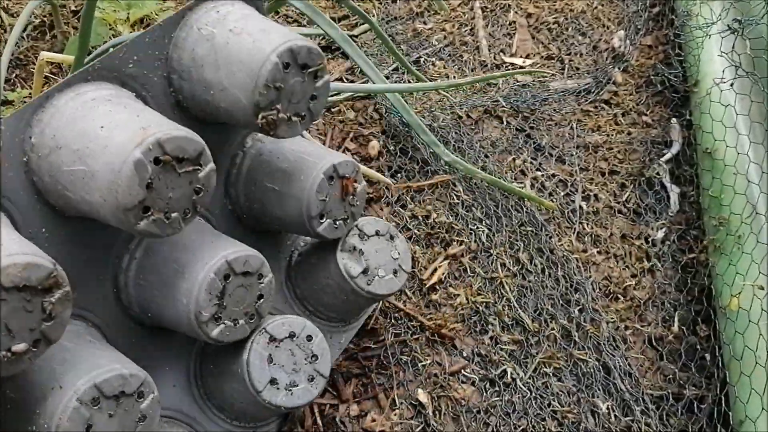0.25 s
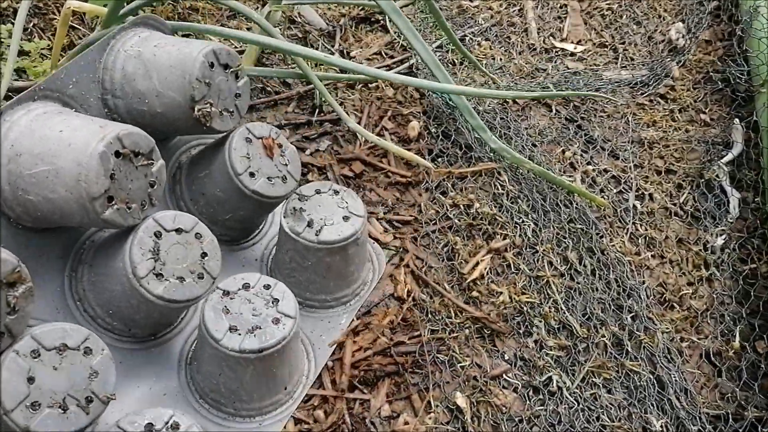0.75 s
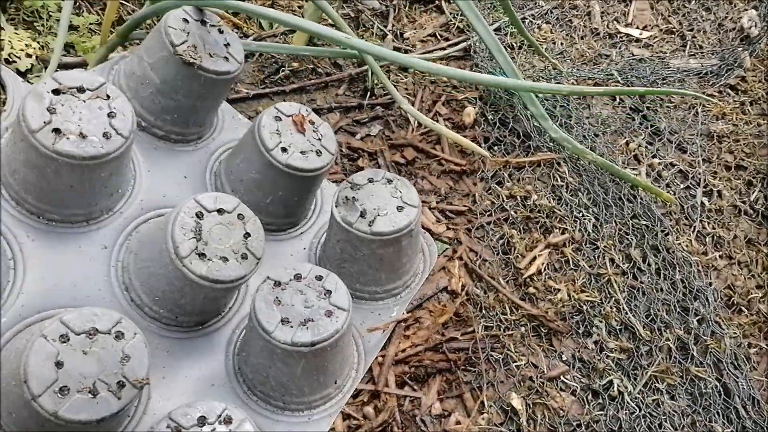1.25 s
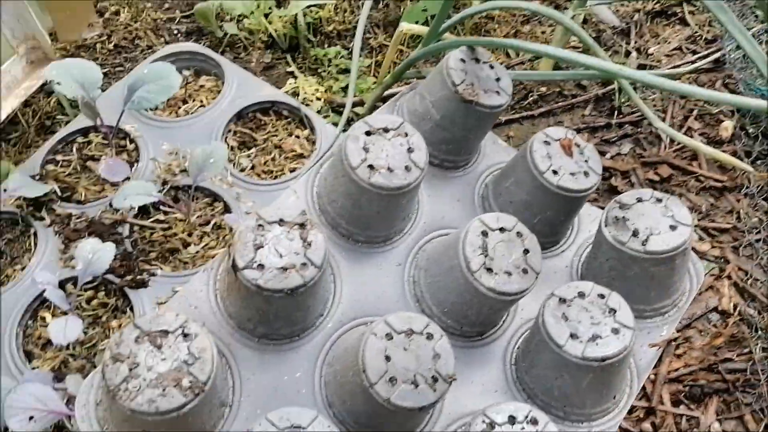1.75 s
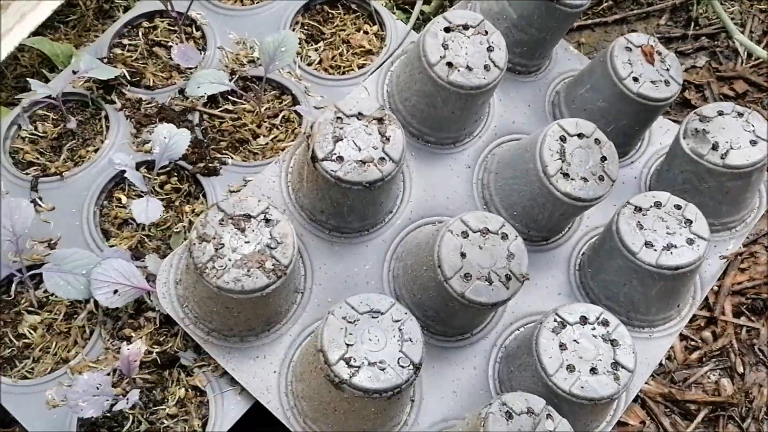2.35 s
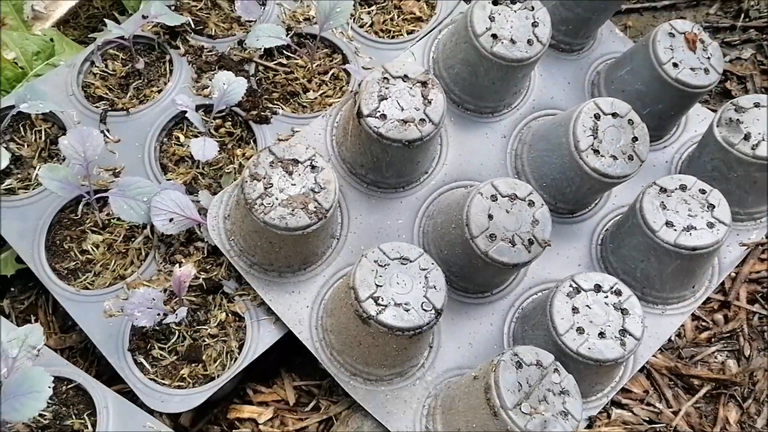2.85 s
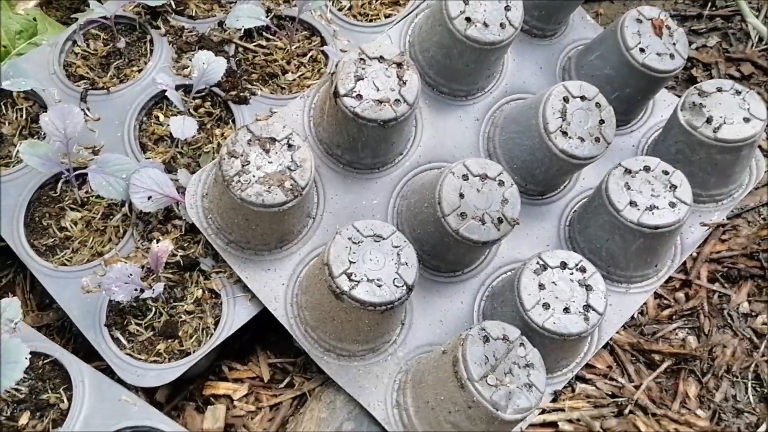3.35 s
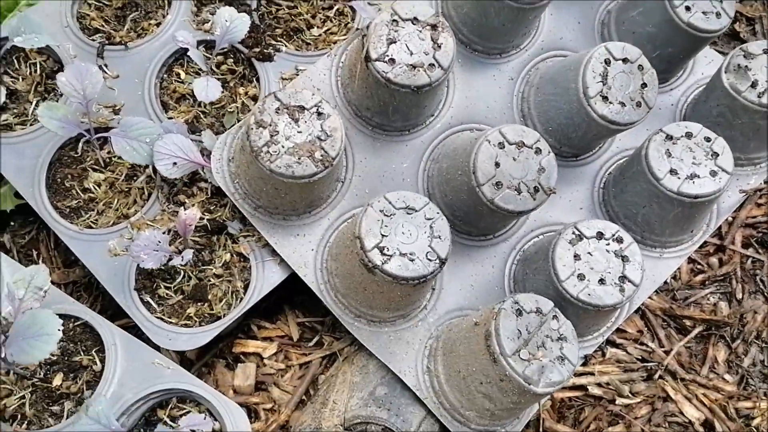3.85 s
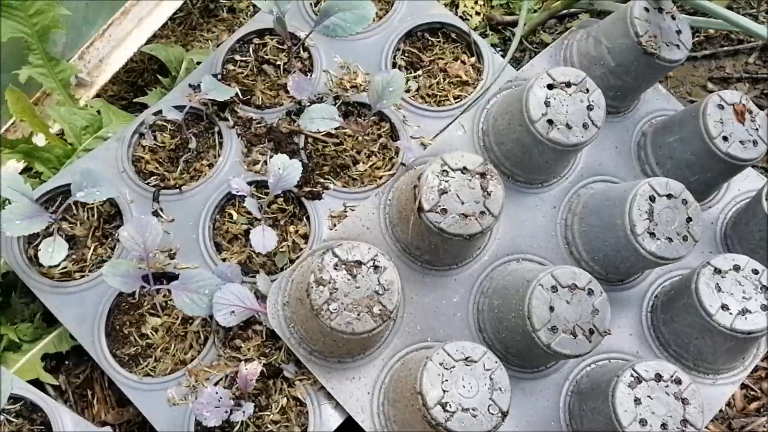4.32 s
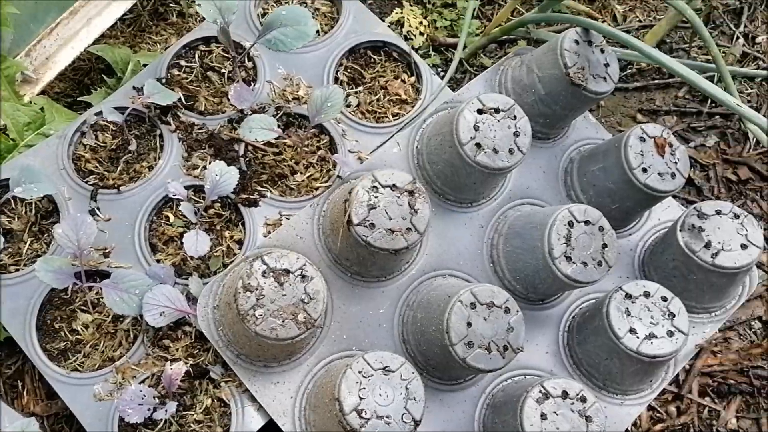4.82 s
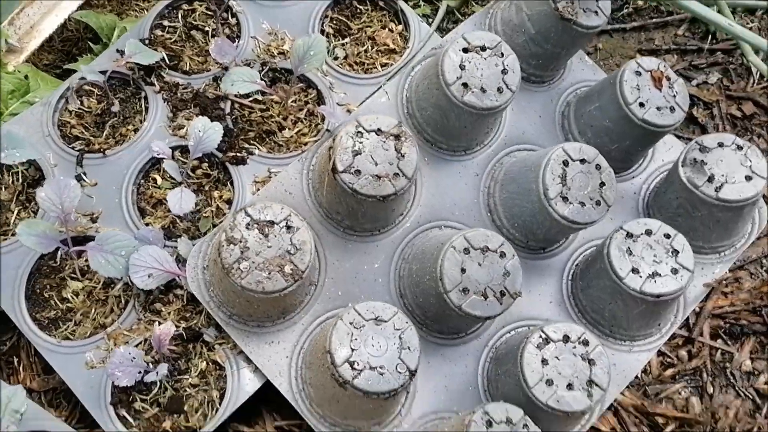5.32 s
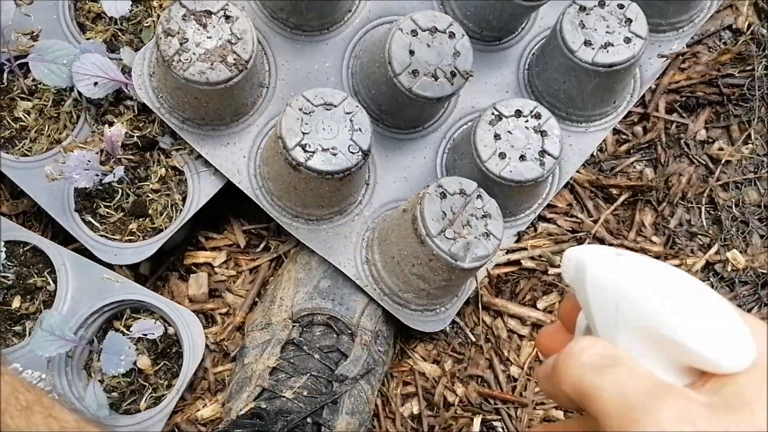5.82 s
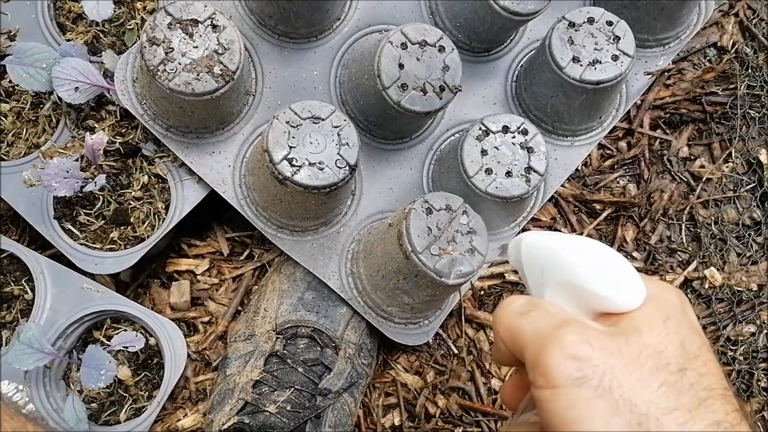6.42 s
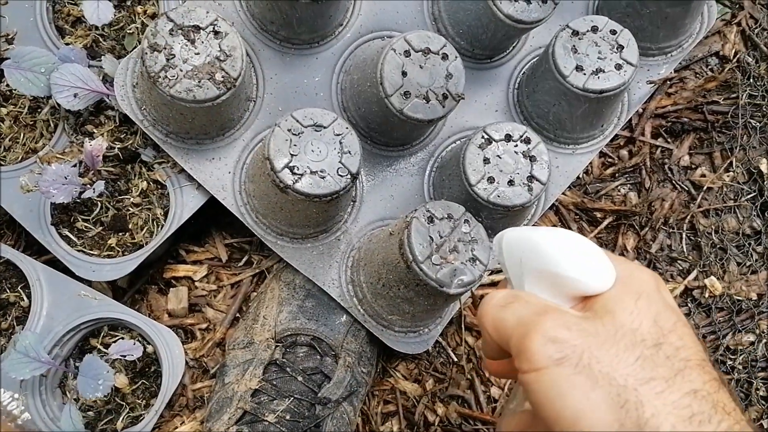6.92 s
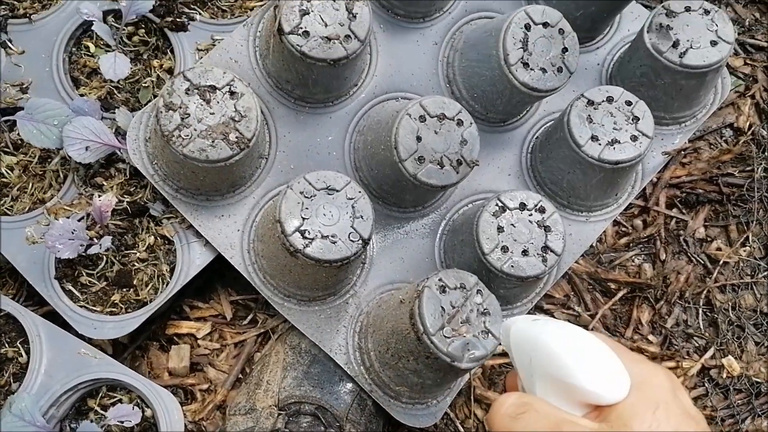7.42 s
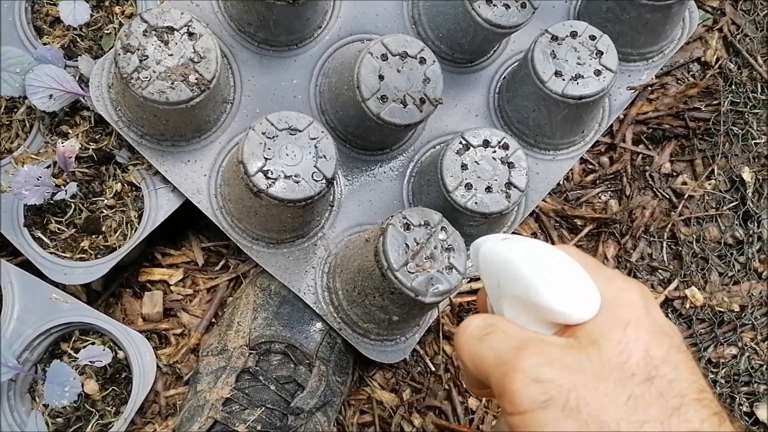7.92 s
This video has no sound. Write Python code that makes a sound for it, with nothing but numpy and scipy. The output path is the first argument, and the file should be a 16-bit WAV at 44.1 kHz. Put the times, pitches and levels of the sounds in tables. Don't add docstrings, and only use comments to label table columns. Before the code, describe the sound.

A quiet garden heard close up in stereo, with low distant traffic and blurred sparrow chatter. From 0 to 0.5 seconds a thin plastic pot tray is turned over: quick hollow knocks, rough rubbing, creaks and gritty ticks. Softer contacts follow near 0.9 to 1.05 and 1.35 as it is set down. Until about 3.7, light rustling and dry ticks leave room for short falling sparrow chirps, some nearby, some echoing off walls, plus very faint high whistles. From 3.8 to 5.6 a plastic bottle is picked up, with lower hollow bumps, rubbing, crackles and a sleeve brush, strongest around 5.2. After a brief lull, four trigger pulls start at about 6.5, 6.85, 7.1 and 7.4: clicks, spitting spurts, airy mist and wet patter on plastic, each fading fast. Sparrows chirp again around 6.9 and from 7.8 to the end.

```python
import sys
import numpy as np
from scipy import signal
from scipy.fft import rfft, irfft
from scipy.io import wavfile
from scipy.ndimage import uniform_filter1d

SR = 44100
rng = np.random.default_rng(int(sys.argv[2]) if len(sys.argv) > 2 else 0)


def gain_from_db(level_db):
    decades = np.asarray(level_db, float) / 20
    return 10 ** decades


def wav_out(sig):
    wavfile.write(sys.argv[1], SR, np.round(np.clip(np.atleast_2d(sig).T, -1, 1) * 32767).astype(np.int16))


N = 360297

# time in seconds, deep rumble in dB, traffic in dB, far sparrow chorus in dB.
BACKGROUND = [(0.0, -55.5, -63, -61.5), (2.73, -59.5, -59.5, -64.5), (4.28, -53.5, -56, -63.5),
              (6.6, -60, -60, -61), (8.17, -51.5, -60.5, -64.5)]
# frequency in Hz, strength in dB per Hz.
RUMBLE_COLOUR = [(12, -19), (20, -8), (65, 1.5), (119, -2.5), (170, -11), (220, -52), (370, -120)]
TRAFFIC_COLOUR = [(88, -37), (150, 0.5), (179, -1), (237, 3), (300, 1.5), (498, -12.5), (718, -13.5),
                  (1360, -17.5), (2500, -23.5), (3250, -41), (5500, -120)]
CHORUS_COLOUR = [(880, -58), (1500, -5), (1730, -10.5), (1990, -2), (3740, 2), (4390, 2), (6200, -8.5),
                 (8060, -20), (13600, -120)]
AIR_COLOUR = [(2650, -24), (4500, -2), (5020, -2), (8370, -11), (9730, -20), (14400, -12), (15400, -20)]
AIR_DB = -83
# frequency in Hz, likeness from 0 to 1.
LIKENESS = [(60, 0.88), (240, 0.91), (950, 0.23), (3770, 0.036), (15000, 0.084)]

# time in seconds, level in dB, left over right in dB.
RUSTLE = [(0.0, -64, -1), (0.7, -82.5, 3), (1.0, -68.5, 2), (1.71, -77, 3.5), (2.39, -57.5, 2),
          (2.71, -74.5, 14.5), (2.89, -72.5, -1), (3.03, -80, 6), (4.59, -65.5, 1.5), (5.03, -51.5, 5.5),
          (5.19, -68.5, 7), (5.7, -69.5, 4), (6.1, -88, 5), (6.3, -61.5, 2), (6.5, -71, 2), (7.0, -71, -4),
          (7.36, -69, 5), (8.17, -78.5, 0)]
# closest pass in seconds, half length in seconds, level in dB.
BRUSHES = [
    (1.36, 0.087, -60.5),
    (3.79, 0.051, -59.5),
    (4.99, 0.024, -47.5),
    (5.412, 0.037, -48.5),
    (6.33, 0.019, -56),
]
# frequency in Hz, strength in dB per Hz.
RUSTLE_COLOUR = [(1760, -20), (3000, -11.5), (4320, -8.5), (8070, -12.5), (9710, -10), (12400, -23),
                 (14500, -24.5), (15400, -18.5)]
BRUSH_COLOUR = [(2060, -39), (3500, -13), (4690, -15), (5600, -0.5), (6770, -10), (10300, -6.5),
                (12000, -22), (15500, -24)]
SWELL_DEPTH_DB, SWELL_ROUNDNESS = 21.5, 0.888
BRUSH_ROUNDNESS = 4

# firmest rub in seconds, half length in seconds, level in dB.
TRAY_GRIPS = [
    (.11, 0.095, -52),
    (.165, 0.037, -50.5),
    (.255, 0.067, -52),
    (.33, 0.22, -48.5),
    (.45, 0.18, -54),
    (.92, 0.19, -59),
    (1.04, 0.17, -54),
    (1.37, 0.28, -58.5),
]
# firmest rub in seconds, half length in seconds, level in dB.
BOTTLE_GRIPS = [(3.8, 0.27, -58.5), (3.97, 0.29, -60.5), (4.33, 0.085, -69), (4.42, 0.048, -54),
                (4.47, 0.072, -77), (4.58, 0.2, -61.5), (4.86, 0.085, -58), (4.88, 0.49, -56),
                (5.03, 0.098, -50), (5.1, 0.073, -62), (5.17, 0.14, -45.5), (5.44, 0.2, -52.5),
                (5.6, 0.1, -54), (6.3, 0.31, -56), (6.56, 0.089, -52.5), (6.72, 0.082, -59),
                (6.88, 0.07, -60), (7.2, 0.84, -62)]
TRAY_HOLLOW_HZ, BOTTLE_HOLLOW_HZ = 750, 391.7

# time in seconds, peak in dB, hollow note in Hz, wall ring in dB.
TRAY_KNOCKS = [
    (0.0, -55.5, 974, 9.5),
    (0.065, -35, 775, -1.5),
    (0.171, -39.5, 767, -18),
    (0.238, -44, 654, -24),
    (0.302, -34.5, 752, -15),
    (0.339, -38.5, 892, -9),
    (0.428, -39.5, 677, -16),
    (0.925, -51.5, 980, -2),
    (1.044, -40.5, 792, -17),
    (1.338, -45, 907, -9),
]
# time in seconds, peak in dB, hollow note in Hz, wall note in Hz, wall ring in dB.
BOTTLE_KNOCKS = [(3.78, -38, 344, 2330, -7), (3.8, -42, 350, 3320, -0.5), (3.823, -47, 355, 2200, -2),
                 (3.952, -42, 390, 2860, -14), (4.121, -39, 330, 2100, 2), (4.319, -59.5, 366, 1430, 10),
                 (4.455, -48, 400, 1400, -23), (4.549, -38, 465, 870, -4), (4.686, -42, 253, 1180, 3.5),
                 (4.74, -58, 282, 2330, 18), (4.85, -42.5, 404, 3130, 0), (5.028, -36.5, 443, 1440, -8.5),
                 (5.079, -46.5, 293, 2180, 5), (5.167, -32, 453, 1690, 4.5), (5.227, -43, 476, 1410, 1),
                 (5.41, -39.5, 400, 1370, -11), (5.577, -46.5, 272, 1440, -12)]
# time in seconds, peak in dB, hollow note in Hz, wall note in Hz,
# wall ring in dB.
TRIGGER_KNOCKS = [
    (6.401, -52.5, 256, 2350, 9.5),
    (6.566, -46.5, 484, 3260, -12),
    (6.691, -46, 500, 2140, 12.5),
    (6.855, -44.5, 280, 1400, 7),
    (6.994, -49.5, 360, 3360, -10),
    (7.131, -45, 340, 3120, 4),
    (7.148, -45.5, 280, 3180, -9),
    (7.407, -52.5, 286, 3340, 16.5),
]
TRAY_PAN_DB, BOTTLE_PAN_DB = 1.5, 3.5
TRAY_WALL_RATIO = 2.13
TRAY_CRACK, BOTTLE_CRACK, TRIGGER_CRACK = 1.6, .15, .12
# time in seconds,
# peak in dB, pitch in Hz, left over right in dB.
TICKS = [(0.065, -47, 5800, 6), (0.171, -35, 5130, -1), (0.275, -43, 3900, -4), (0.243, -46, 5000, 0.5),
         (0.3403, -30.5, 5840, 2.5), (0.593, -44, 7450, 1), (0.428, -46, 5640, 0.5),
         (2.6319, -56, 5360, -8), (2.6876, -39, 5500, 15), (2.7626, -43.5, 5640, 23),
         (2.8777, -33, 7730, -4.5), (3.728, -39.5, 5430, 7), (4.2256, -34, 5700, 6),
         (4.377, -39.5, 4580, 5), (4.41, -27.5, 6360, 2), (4.685, -41, 2880, 2.5), (5.169, -34.5, 5500, 27),
         (5.233, -41.5, 5470, 22), (6.272, -45, 5950, 2), (7.407, -33, 6850, 13)]
# time in seconds, peak in dB, pitch in Hz, left over right in dB.
TAPS = [(0.065, -21, 1560, 0.5), (0.0652, -21.5, 3080, -3), (0.0678, -25.5, 2380, -2.5),
        (0.0708, -30.5, 906, 1), (.098, -46, 886, 3), (.144, -41, 686, 1), (.158, -48, 690, 0.5),
        (.183, -44, 710, -1), (.201, -53, 598, 1), (.219, -48, 570, -2), (.258, -38, 695, 0),
        (.295, -29, 700, 2.5), (.322, -35, 750, 10), (.36, -38, 755, -2), (.385, -54, 700, -9),
        (.461, -35, 710, 2), (.518, -48, 705, 1.5), (.699, -55, 690, 1), (.845, -57, 770, -2),
        (.899, -58, 666, -4), (0.926, -38, 2500, 9), (.993, -51, 754, 5), (1.026, -51, 907, -1),
        (1.422, -54, 869, -5), (2.632, -45.5, 1890, 3.5), (2.878, -47, 2060, 0.5), (4.498, -49, 1500, 3),
        (4.56, -39, 1010, 5), (4.639, -42, 2400, 3), (4.686, -33, 2700, 2.5), (4.696, -33, 1160, 1),
        (4.832, -44, 480, 1), (4.867, -37, 420, 1.5), (4.89, -40, 1490, 11), (5.012, -41, 1360, 17),
        (5.152, -44, 1530, 9), (5.325, -53, 1550, 1), (5.463, -39, 2730, 1), (5.466, -42.5, 435, 1.5),
        (7.406, -29, 6550, 7), (5.557, -52, 1426, 13), (6.282, -39, 7800, 5.5), (6.314, -36, 7750, 13),
        (6.5382, -28, 3300, 4), (6.5452, -18, 3320, 1), (6.849, -46, 3600, 6), (6.678, -42, 2320, 4.5),
        (6.7, -50, 2400, 2), (6.718, -40.5, 420, 2.5), (6.745, -51, 2300, -4)]
TAP_CYCLES = 27

# start in seconds, length in seconds, first pitch in Hz, last pitch in Hz, level in dB.
NEAR_CHIRPS = [(0.315, 0.078, 4400, 2880, -46), (0.378, 0.056, 4320, 2445, -48),
               (1.39, 0.047, 3300, 3210, -48), (1.425, 0.043, 3200, 2386, -49.5),
               (1.585, 0.073, 4670, 2920, -54), (1.72, 0.035, 3600, 3800, -52),
               (1.752, 0.028, 3500, 2660, -53), (1.775, 0.041, 2810, 2470, -45),
               (1.823, 0.06, 4700, 2930, -52), (2.4, 0.046, 4600, 2880, -42.5),
               (2.435, 0.036, 3620, 2310, -43.5), (2.785, 0.042, 3250, 3305, -51),
               (2.835, 0.026, 3380, 2830, -51.5), (2.992, 0.059, 4460, 2730, -43.5),
               (3.045, 0.047, 3040, 2530, -45), (3.085, 0.095, 3860, 2267, -45.5),
               (3.306, 0.038, 4500, 3280, -51.5), (3.335, 0.071, 3700, 2650, -49.5),
               (3.522, 0.031, 4150, 3830, -55.5), (3.552, 0.044, 4100, 3000, -58),
               (3.895, 0.066, 3880, 2760, -49.5), (3.953, 0.076, 4086, 2440, -44.5),
               (4.065, 0.074, 4580, 3310, -46.5), (4.17, 0.039, 4300, 2790, -46),
               (4.778, 0.045, 4430, 3380, -48), (4.822, 0.058, 3250, 2915, -50),
               (5.69, 0.054, 4700, 2610, -43.5), (5.776, 0.083, 4120, 3180, -47.5),
               (6.915, .018, 3970, 3920, -44), (6.945, 0.041, 4150, 3530, -47.5),
               (6.98, 0.049, 4200, 2490, -49.5), (7.86, 0.079, 3300, 2725, -55),
               (7.908, 0.036, 4550, 4480, -51.5), (7.918, 0.051, 4100, 3320, -44.5),
               (7.965, 0.035, 3700, 2890, -53), (8.138, 0.019, 2670, 4150, -56),
               (8.154, 0.025, 4240, 3110, -41.5)]
# start in seconds, length in seconds, first pitch in Hz, last pitch in Hz,
# level in dB.
FAR_CHIRPS = [(0.075, 0.076, 4380, 3900, -54.5), (0.155, 0.092, 3720, 3640, -52),
              (0.62, 0.044, 4300, 3200, -59), (0.67, 0.055, 4220, 3630, -66),
              (0.775, 0.059, 4340, 3260, -56), (1.1, 0.061, 3730, 3620, -57),
              (1.87, 0.082, 4520, 4160, -53.5), (1.97, 0.11, 4460, 4380, -67),
              (2.13, 0.14, 4630, 4380, -61), (2.28, 0.16, 4700, 3880, -51), (3.127, 0.1, 4220, 3250, -52),
              (3.66, 0.045, 4250, 2940, -48), (3.61, .05, 3980, 4180, -55), (3.36, 0.048, 4570, 4350, -61),
              (4.27, 0.077, 3880, 3080, -53.5), (4.32, 0.06, 4300, 2904, -48.5),
              (4.585, 0.055, 3750, 3500, -46), (5.066, 0.085, 4370, 3204, -49.5),
              (7.797, 0.045, 4200, 4210, -48)]
NEAR_SHAKE, FAR_SHAKE = .045, .08
EDGE_SOFTNESS = .42
SPARROW_PAN_DB, FAR_DIRECT_DB = 1.68, -13
YARD_T60_S, YARD_DB = .3, -0.6
# start in seconds, length in seconds, first pitch in Hz, last pitch in Hz,
# level in dB.
WHISTLES = [(.81, 0.062, 9800, 9350, -69), (.86, 0.048, 9500, 9750, -67), (.945, .02, 9800, 9550, -74),
            (.975, 0.045, 9800, 9900, -75), (1.0, 0.055, 11000, 11200, -74),
            (1.08, 0.027, 11100, 10700, -75), (1.155, .025, 10200, 11200, -72),
            (1.175, 0.03, 9900, 9750, -82), (1.265, .09, 11300, 11000, -77),
            (1.275, 0.044, 10000, 9800, -80), (1.45, 0.12, 10550, 10100, -67),
            (3.695, 0.049, 9600, 9000, -62), (3.805, 0.067, 10650, 11800, -75),
            (3.81, .03, 9100, 9300, -73), (3.845, 0.04, 8100, 8200, -77), (3.935, 0.033, 9700, 9100, -76),
            (3.98, .03, 9200, 9600, -68), (4.11, .07, 10900, 10200, -61), (5.985, 0.044, 9200, 9900, -85),
            (6.06, 0.057, 10800, 11000, -85), (6.1, 0.05, 11050, 10750, -73), (6.125, .05, 9150, 9600, -72),
            (6.175, 0.045, 9450, 9300, -67.5), (6.205, 0.037, 9300, 9800, -73),
            (6.22, 0.046, 10300, 10700, -85), (6.23, 0.068, 9100, 9800, -84),
            (6.37, 0.033, 8950, 9400, -76), (6.4, .025, 9500, 9650, -69), (6.425, .03, 9400, 9400, -74),
            (6.455, .04, 9800, 9550, -74.5), (6.49, 0.026, 9350, 8950, -73)]

# start in seconds, length in seconds, mist in dB, splash on the pot in dB,
# sag as pressure drops in dB per second.
PULLS = [
    (6.538, 0.21, -50.5, -54, 54.5),
    (6.847, 0.36, -50.5, -55.5, 65),
    (7.118, 0.19, -45.5, -69, 100),
    (7.412, 0.14, -44.5, -44.5, 136),
]
# time in seconds, splash peak in dB, mist peak in dB.
SPURTS = [(6.534, -20.5, -45), (6.543, -21, -33), (6.559, -53.5, -36), (6.677, -39, -66), (6.686, -38, -63),
          (6.846, -31, -60), (6.854, -27, -44), (6.873, -47, -35.5), (6.886, -54, -41), (6.906, -56, -48),
          (6.918, -56, -49), (6.9504, -50, -35), (6.991, -30, -49), (7.0404, -66.5, -49),
          (7.0866, -59, -42), (7.127, -22, -39.5), (7.14, -32, -34), (7.161, -44, -39)]
# frequency in Hz, strength in dB per Hz.
MIST_COLOUR = [(2350, -24), (4000, -11.5), (4400, -14.5), (5590, -12), (8080, -14), (9740, -8.5),
               (10200, -10.5), (11000, -18), (14600, -19), (15400, -25)]
SPLASH_COLOUR = [(530, -52), (900, -17.5), (1920, -22.5), (2270, -5), (2820, -12.5), (3290, -3), (4220, -9),
                 (7000, -16.5), (9100, -27), (15400, -120)]
PRESSURE_RISE_S, RISE_DB, SPLASH_SAG_RATIO = 0.046, 10, 0.57
SHUT_S, SHUT_DB = .05, 18
SPURT_T60_S, SPURT_RISE_S = 0.047, 0.0059
PUFF_T60_S, PUFF_RISE_S = 0.045, 0.0062

CUTOFF_HZ = 16000


def in_time(rows):
    s, *columns = np.transpose(rows)
    return [np.interp(np.arange(N) / SR, s, column) for column in columns]


def at_hz(points, hz):
    point_hz, value = np.transpose(points)
    return np.interp(np.log(hz), np.log(np.maximum(point_hz, 1)), value)


def rms_one(x):
    return x / np.sqrt(np.mean(x ** 2) + 1e-20)


def drift(rate):
    r = np.exp(-80 * np.pi * rate / SR)
    noise = rng.standard_normal(N // 40 + 2002)
    slow = signal.lfilter([1], [1, -2 * r, r * r], noise)[2000:]
    return np.interp(np.arange(N) / 40, np.arange(len(slow)), rms_one(slow))


def coloured(spectrum, grain_db=0, flicker_db=0, flicker_rate=20):
    grains = gain_from_db(grain_db * np.minimum(rng.exponential(1, N), 6))
    white = rng.standard_normal((2, N)) * grains
    hz = np.maximum(np.fft.rfftfreq(N, 1 / SR), 1)
    alike = np.clip(at_hz(LIKENESS, hz), 0, 1)
    mid, side = rfft(white) * gain_from_db(at_hz(spectrum, hz))
    both = irfft(np.sqrt(1 + alike) * mid + np.sqrt(1 - alike) * side * [[1], [-1]], N)
    return rms_one(both * gain_from_db(flicker_db * drift(flicker_rate)))


def sides(pan_db):
    return gain_from_db(np.multiply.outer([.5, -.5], pan_db))


def add(out, s, sound, pan_db, lag_per_db=0.5):
    for side, gain, way in zip(out, sides(pan_db), (-1, 1)):
        lag = way * lag_per_db * np.clip(pan_db, -6, 6)
        at = max(round(s * SR + lag), 0)
        side[at:at + len(sound)] += gain * sound[:N - at]


def dying(t60, rise):
    t = np.arange(SR // 5) / SR
    return t, gain_from_db(-60 * t / t60) * (1 - np.exp(-t / rise))


def resonate(x, hz, width_hz):
    r = np.exp(-np.pi * width_hz / SR)
    feedback = [1, -2 * r * np.cos(2 * np.pi * hz / SR), r * r]
    return signal.lfilter([(1 - r * r) / 2, 0, (r * r - 1) / 2], feedback, x)


def dull(x, hz):
    return signal.sosfilt(signal.butter(3, hz, fs=SR, output="sos"), x)


def swells(rows, roundness=SWELL_ROUNDNESS):
    t = np.arange(0, N, 40) / SR
    power = 0
    for s, half, db in rows:
        fall_db = SWELL_DEPTH_DB * (abs(t - s) / max(half, .01)) ** roundness
        power = power + gain_from_db(db - fall_db) ** 2
    return np.interp(np.arange(N) / SR, t, np.sqrt(power))


def patchy(x, depth_db):
    spectrum = signal.stft(x, nperseg=512)[2]
    chance = rng.standard_normal(spectrum.shape[1:])
    for axis, size in ((0, 7), (1, 19), (0, 7), (1, 19)):
        chance = uniform_filter1d(chance, size=size, axis=axis)
    return signal.istft(spectrum * gain_from_db(depth_db * rms_one(chance)), nperseg=512)[1][:, :N]


def rumble():
    return gain_from_db(in_time(BACKGROUND)[0]) * coloured(RUMBLE_COLOUR) * sides(-0.08)[:, None]


def garden():
    _, traffic_db, chorus_db = in_time(BACKGROUND)
    traffic = gain_from_db(traffic_db + 2.0) * coloured(TRAFFIC_COLOUR, flicker_db=3.0, flicker_rate=3.2)
    traffic = traffic * sides(1.9)[:, None]
    chorus = gain_from_db(chorus_db + 2.5) * coloured(CHORUS_COLOUR, flicker_db=2.5, flicker_rate=4.8)
    return traffic + chorus + gain_from_db(AIR_DB) * coloured(AIR_COLOUR)


def rustle():
    level_db, pan_db = in_time(RUSTLE)
    grains = coloured(RUSTLE_COLOUR, grain_db=2.5, flicker_db=4.5, flicker_rate=5)
    steady = gain_from_db(level_db + 5.5) * sides(pan_db) * grains
    brush = swells(BRUSHES, BRUSH_ROUNDNESS) * sides(7.1)[:, None] * coloured(BRUSH_COLOUR, grain_db=4.0)
    return steady + brush


def rubbing():
    tray, bottle = swells(TRAY_GRIPS), swells(BOTTLE_GRIPS)
    hollow_hz = np.where(tray > bottle, TRAY_HOLLOW_HZ, BOTTLE_HOLLOW_HZ)
    slow = signal.lfilter(*signal.butter(2, 150, fs=SR), rng.standard_normal((2, N)))
    slow = slow * gain_from_db(4.8 * drift(47))
    turn = 2 * np.pi * np.cumsum(hollow_hz) / SR
    hum = rms_one(slow[0] * np.cos(turn) + slow[1] * np.sin(turn))
    slips = (rng.random(N) < 1800 / SR) * rng.standard_normal(N) * gain_from_db(5 * drift(18))
    slips = dull(slips, 3000)
    crackle = resonate(slips, 1240, 300) + resonate(slips, 1600, 460) + 0.9 * resonate(slips, 1790, 950)
    crackle = rms_one(crackle)
    hollow = np.stack([hum, np.where(tray > bottle, 1.1, 0.57) * np.roll(hum, 6)])
    dry_part = np.stack([crackle, 1.94 * np.roll(crackle, 14)])
    return (tray + bottle) * (hollow + gain_from_db(-1.0) * dry_part)


def knocks():
    out = np.zeros((2, N))
    t, swell = dying(0.062, rise=0.00055)
    rattle_fall = dying(0.034, rise=0.0012)[1]
    thud_fall = dying(0.088, rise=0.0064)[1]
    wall_fall = dying(0.05, rise=0.0033)[1]
    broad = signal.butter(1, [300, 5000], "band", fs=SR)
    tray = [(s, db, hz, TRAY_WALL_RATIO * hz, wall_db) for s, db, hz, wall_db in TRAY_KNOCKS]
    groups = [(tray, TRAY_PAN_DB, TRAY_CRACK), (BOTTLE_KNOCKS, BOTTLE_PAN_DB, BOTTLE_CRACK),
              (TRIGGER_KNOCKS, BOTTLE_PAN_DB, TRIGGER_CRACK)]
    for rows, pan_db, crack in groups:
        for s, peak_db, hollow_hz, wall_hz, wall_db in rows:
            rattle = rng.standard_normal(len(t)) * rattle_fall
            thud = rng.standard_normal(len(t)) * thud_fall
            hollow = swell * np.sin(2 * np.pi * hollow_hz * t)
            hollow += 3 * resonate(rattle, 1.7 * hollow_hz, 130)
            hollow += 4 * resonate(thud, 1.03 * hollow_hz, 165) + 7.3 * resonate(thud, 337, 79)
            wall = crack * signal.lfilter(*broad, rattle)
            wall += 2.0 * resonate(resonate(rattle, wall_hz, 610), wall_hz, 610)
            wall += 0.08 * wall_fall * np.sin(2 * np.pi * wall_hz * t)
            add(out, s, gain_from_db(peak_db + 3.0) * hollow, pan_db)
            add(out, s, gain_from_db(peak_db + wall_db + 14.0) * wall, 0.683 * pan_db, lag_per_db=6.5)
    return dull(out, 6900)


def ticks():
    out = np.zeros((2, N))
    t, fall = dying(0.015, rise=0.00009)
    bright = signal.butter(2, [3000, 9000], "band", fs=SR, output="sos")
    for s, peak_db, hz, pan_db in TICKS:
        snap = signal.sosfilt(bright, rng.standard_normal(len(t)))
        ring = 0.48 * np.sin(2 * np.pi * hz * t)
        add(out, s, gain_from_db(peak_db - 5.0) * fall * (snap + ring), pan_db)
    return out


def taps():
    out, t = np.zeros((2, N)), np.arange(SR // 10) / SR
    for s, peak_db, hz, pan_db in TAPS:
        low, high = rng.uniform(.06, .18, 2)
        ring = np.sin(2 * np.pi * hz * t)
        ring += 0.32 * np.sin(2 * np.pi * hz * (1 - low) * t)
        ring -= 0.57 * np.sin(2 * np.pi * hz * (1 + high) * t)
        fall = gain_from_db(peak_db - 60 * t * hz / TAP_CYCLES) * np.clip(t * hz, 0, 1)
        add(out, s, fall * ring, pan_db, lag_per_db=4.0)
    return out


def chirps(rows, shake, flutter):
    out = np.zeros((2, N))
    for s, length, first_hz, last_hz, level_db in rows:
        u, at = np.linspace(0, 1, round(length * SR)), round(s * SR)
        held = np.resize(np.stack([shake, flutter])[:, at:at + len(u)].T, (len(u), 2))
        pitch_shake, strength_shake = held.T
        hz = (first_hz + (last_hz - first_hz) * u) * (1 + pitch_shake)
        upper_hz = 0.42 * hz + 0.61 * first_hz * (1 - 0.0612 * strength_shake)
        voice = gain_from_db(2.5 * strength_shake) * np.sin(2 * np.pi * np.cumsum(hz) / SR)
        voice += gain_from_db(-14.0 - 4.1 * strength_shake) * np.sin(2 * np.pi * np.cumsum(upper_hz) / SR)
        voice *= 1 + 0.27 * np.sin(2 * np.pi * 75 * length * u)
        call = gain_from_db(level_db + 1.0) * np.sin(np.pi * u) ** EDGE_SOFTNESS * voice
        add(out, s, call, SPARROW_PAN_DB, lag_per_db=7.0)
    return out


def yard(x):
    t = np.arange(SR) / SR
    tail = rng.standard_normal((2, SR)) * gain_from_db(-60 * t / YARD_T60_S) * np.clip(t / 0.00019, 0, 1)
    tail /= np.sqrt(np.sum(tail ** 2, axis=1, keepdims=True))
    return gain_from_db(YARD_DB) * signal.fftconvolve(x, tail, axes=1)[:, :N]


def sparrows():
    shake, flutter = drift(197), drift(67.5)
    near = chirps(NEAR_CHIRPS, NEAR_SHAKE * shake, flutter)
    far = chirps(FAR_CHIRPS, FAR_SHAKE * shake, flutter)
    return near + gain_from_db(FAR_DIRECT_DB) * far + yard(near + far)


def whistles():
    out, waver, flutter = np.zeros((2, N)), drift(45), drift(45)
    for s, length, first_hz, last_hz, level_db in WHISTLES:
        u, at = np.linspace(0, 1, round(length * SR)), round(s * SR)
        hz = (first_hz + (last_hz - first_hz) * u) * (1 + .006 * waver[at:at + len(u)])
        strength = gain_from_db(level_db - 1.2 + 3 * flutter[at:at + len(u)]) * np.sin(np.pi * u) ** .4
        add(out, s, strength * np.sin(2 * np.pi * np.cumsum(hz) / SR), 1.5)
    return out


def pressure(s, length, peak_db, sag):
    last_db = peak_db - sag * (length - PRESSURE_RISE_S)
    return [(s, peak_db - RISE_DB), (s + PRESSURE_RISE_S, peak_db),
            (s + length, last_db), (s + length + SHUT_S, last_db - SHUT_DB)]


def jet(pulls):
    t, out = np.arange(0, N, 40) / SR, 0
    for pull in pulls:
        s, db = np.transpose(pressure(*pull))
        out = out + gain_from_db(np.interp(t, s, db)) * (t >= s[0]) * (t < s[-1])
    return np.interp(np.arange(N) / SR, t, out)


def spray():
    mist = jet([(s, length, db, sag) for s, length, db, _, sag in PULLS])
    splash = jet([(s, length, db, SPLASH_SAG_RATIO * sag) for s, length, _, db, sag in PULLS])
    spurt = dying(SPURT_T60_S, SPURT_RISE_S)[1]
    puff = dying(PUFF_T60_S, PUFF_RISE_S)[1]
    mist_spits, splash_spits = np.zeros((2, 2, N))
    for s, splash_peak_db, mist_peak_db in SPURTS:
        add(mist_spits, s, gain_from_db(mist_peak_db + 6.0) * puff, 0)
        add(splash_spits, s, gain_from_db(splash_peak_db - 2.5) * spurt, 0)
    hiss = coloured(MIST_COLOUR, grain_db=1.5, flicker_db=2.2, flicker_rate=55)
    patter = coloured(SPLASH_COLOUR, grain_db=3.0, flicker_db=-1.0, flicker_rate=55)
    return ((mist + mist_spits) * hiss + (splash + splash_spits) * patter) * sides(1.6)[:, None]


def scene():
    background = rumble() + patchy(garden() + rustle(), depth_db=1.1)
    handling = rubbing() + knocks() + ticks() + taps()
    return background + handling + sparrows() + whistles() + spray()


def top_cut(x):
    return signal.sosfilt(signal.butter(12, 15830, fs=SR, output="sos"), x)


def record(dry):
    steep = signal.cheby2(14, 60, CUTOFF_HZ, fs=SR, output="sos")
    mix = signal.sosfilt(steep, dry)
    return top_cut(mix)


dry = scene()
out = record(dry)
wav_out(out)
```